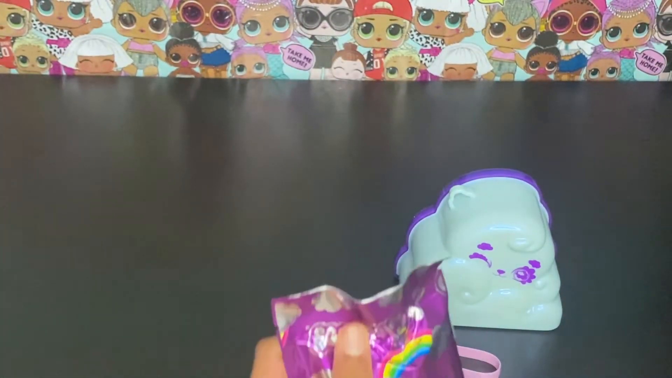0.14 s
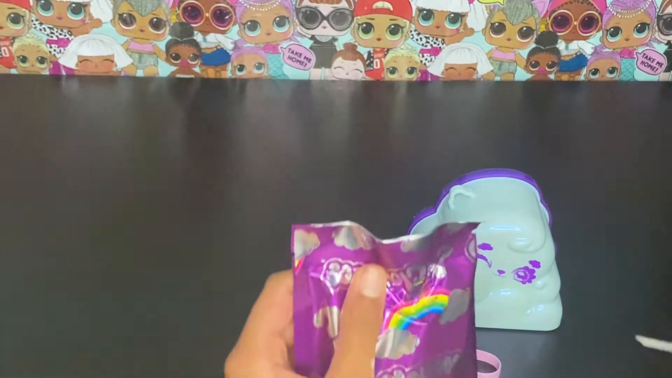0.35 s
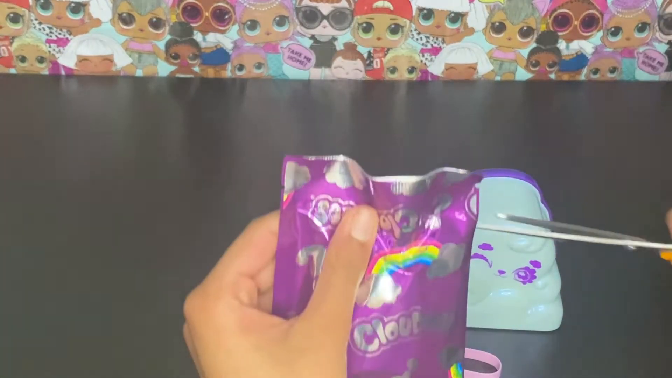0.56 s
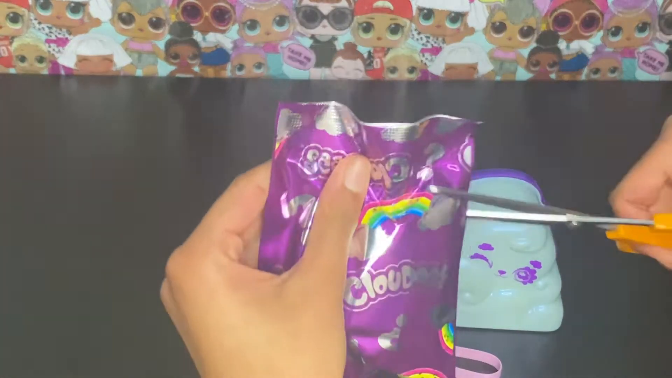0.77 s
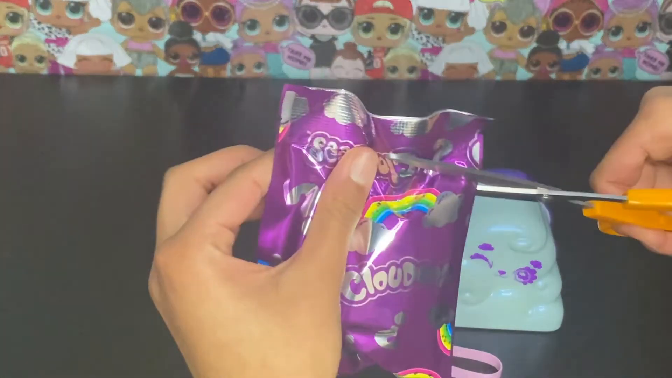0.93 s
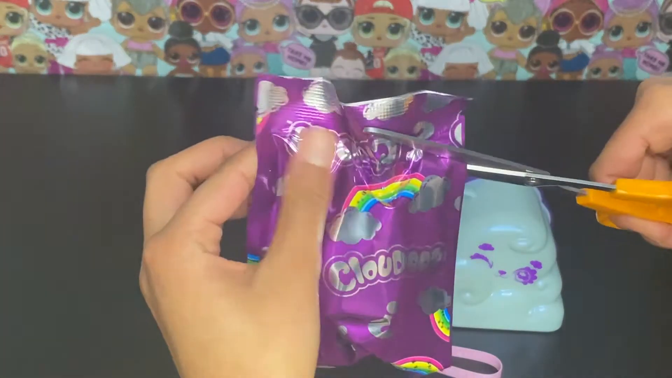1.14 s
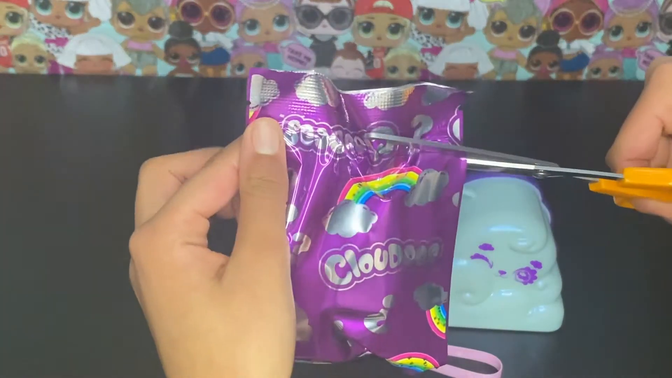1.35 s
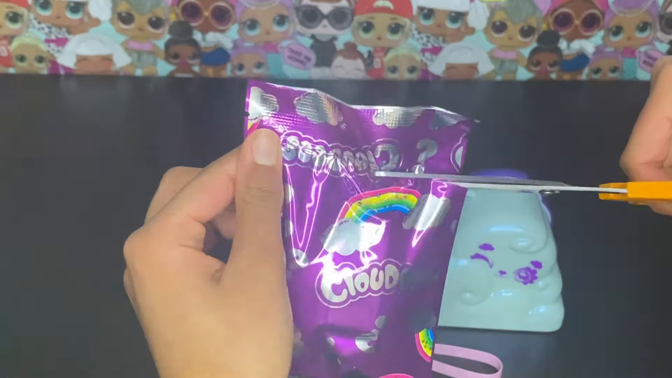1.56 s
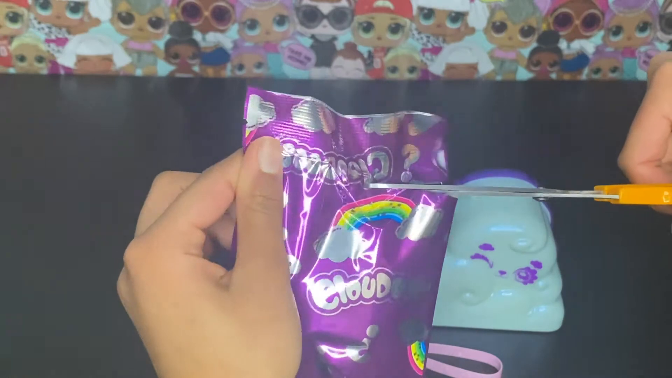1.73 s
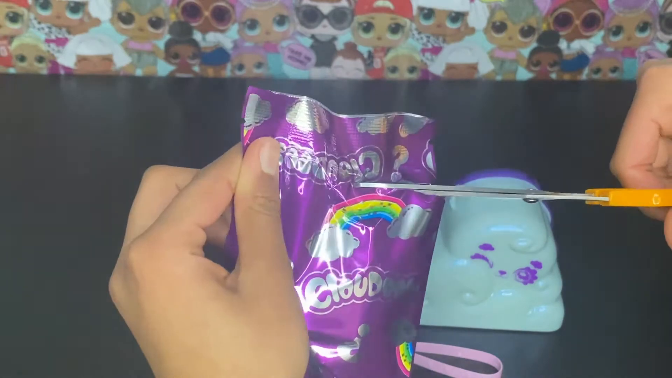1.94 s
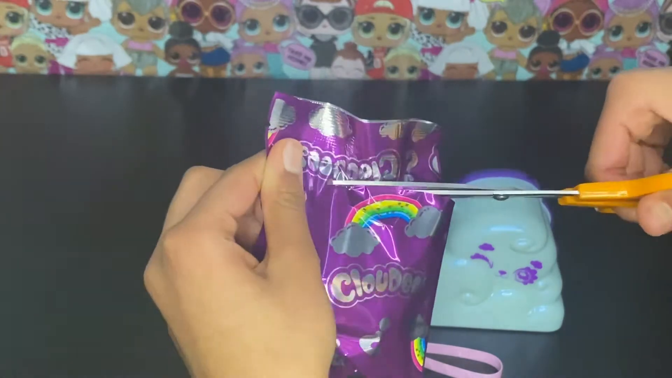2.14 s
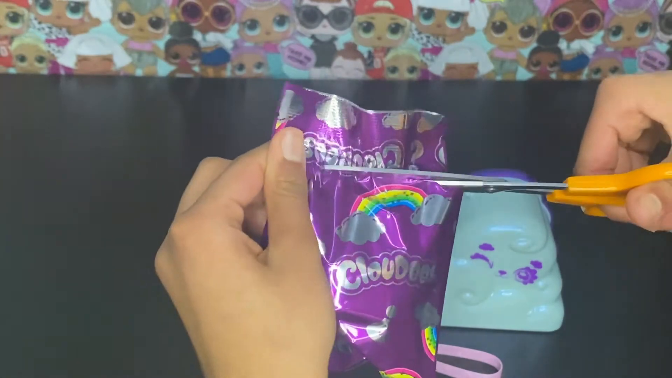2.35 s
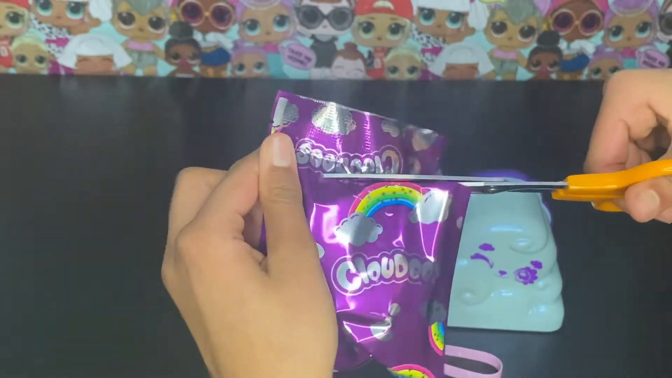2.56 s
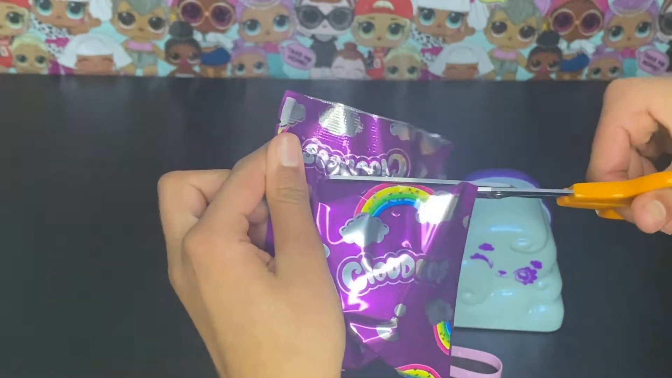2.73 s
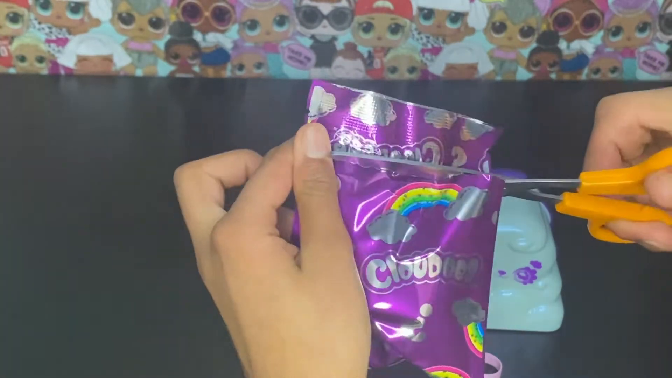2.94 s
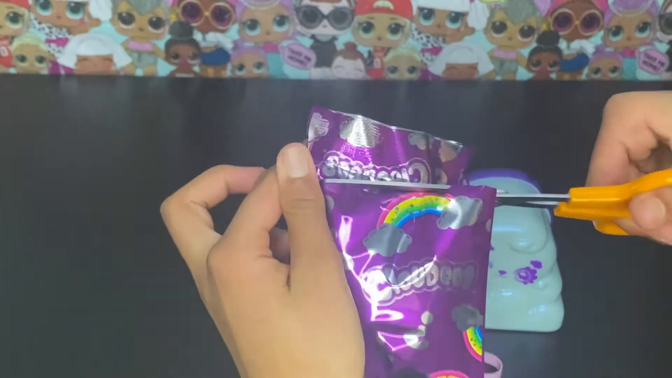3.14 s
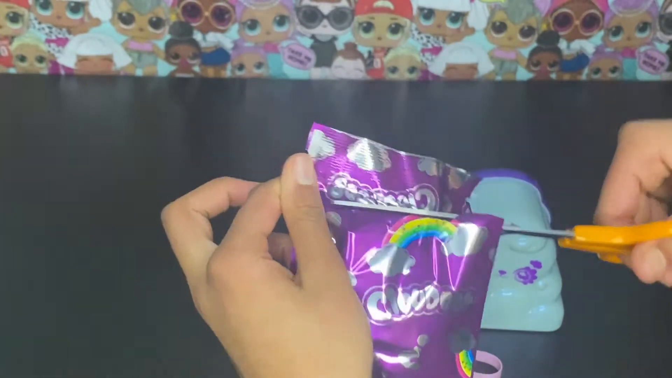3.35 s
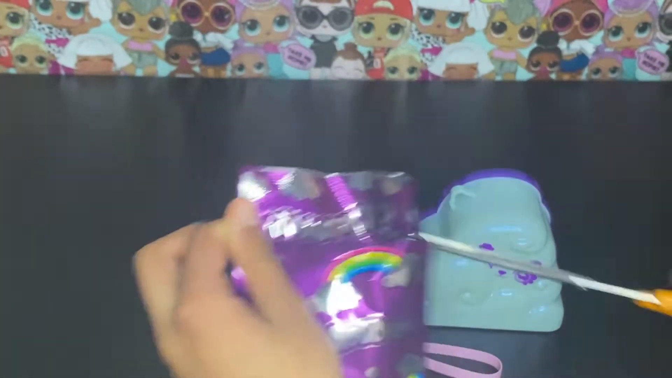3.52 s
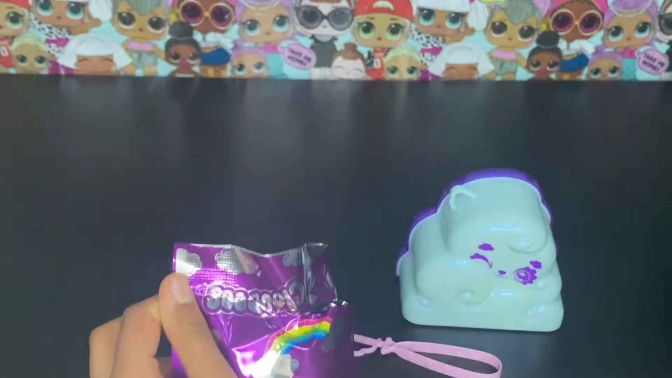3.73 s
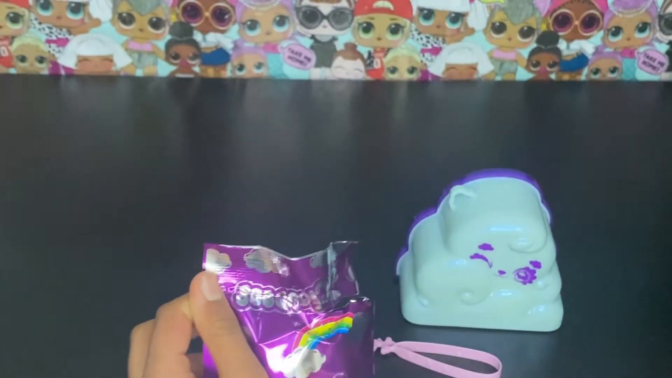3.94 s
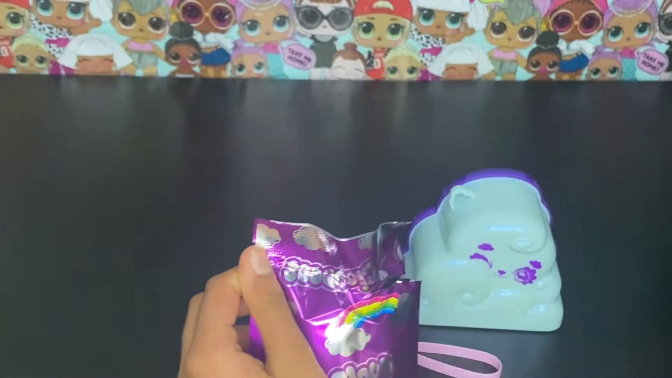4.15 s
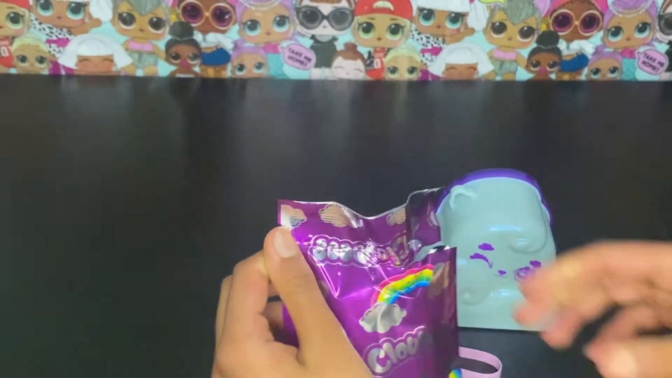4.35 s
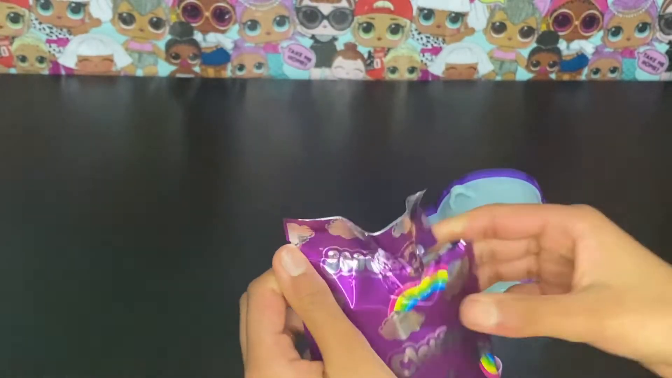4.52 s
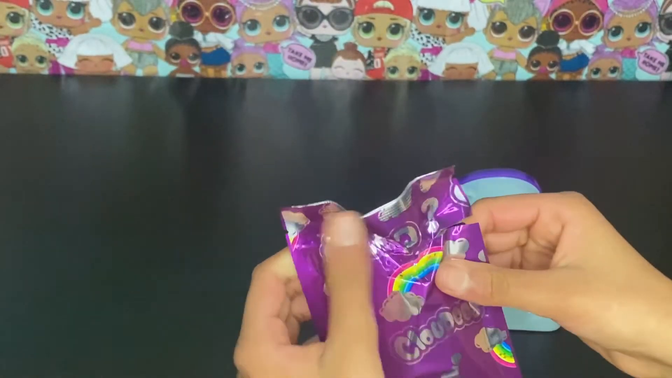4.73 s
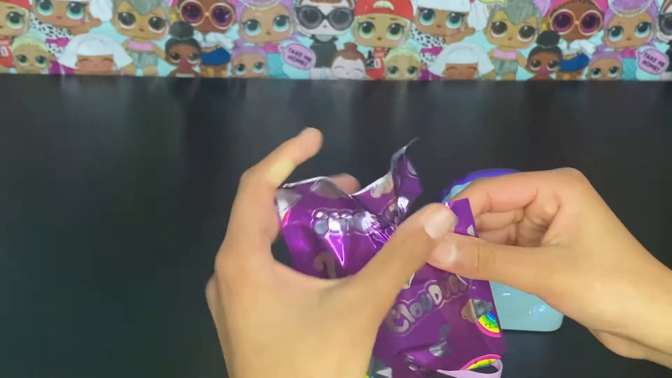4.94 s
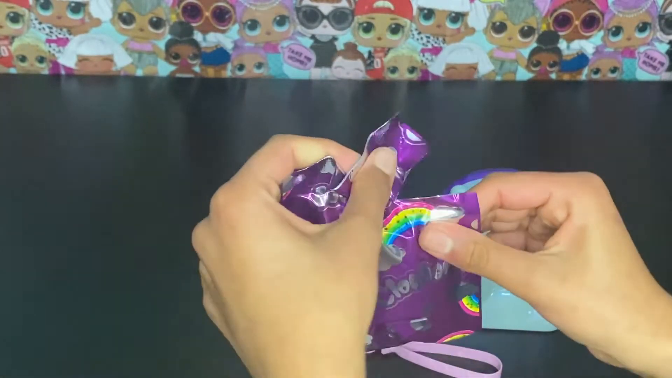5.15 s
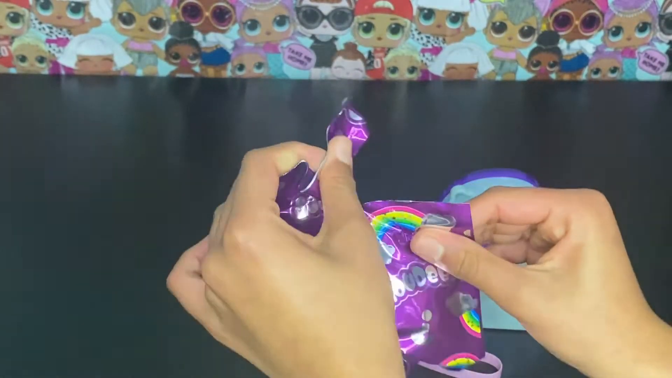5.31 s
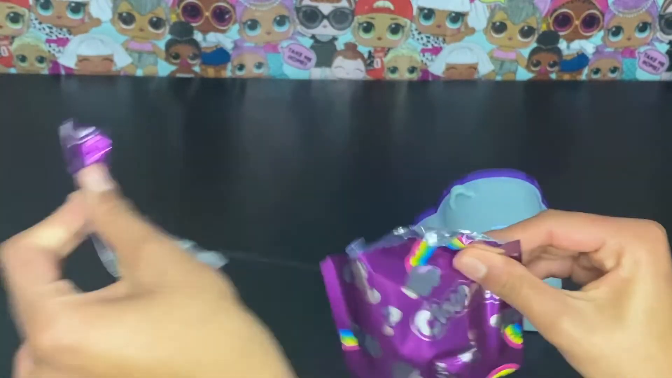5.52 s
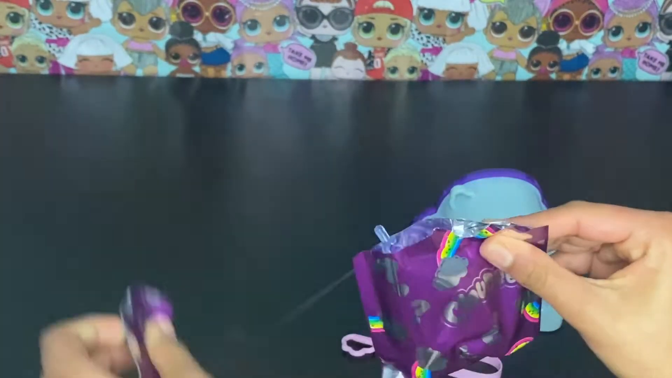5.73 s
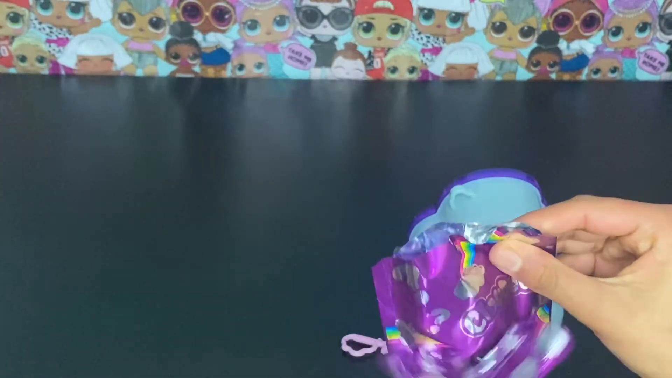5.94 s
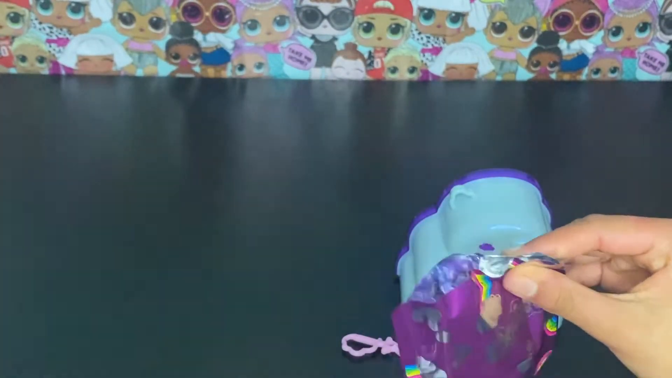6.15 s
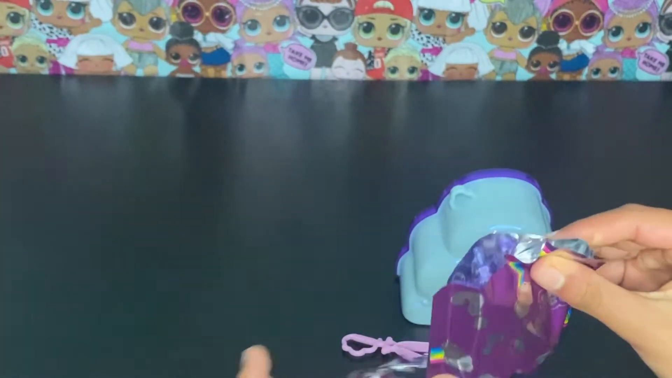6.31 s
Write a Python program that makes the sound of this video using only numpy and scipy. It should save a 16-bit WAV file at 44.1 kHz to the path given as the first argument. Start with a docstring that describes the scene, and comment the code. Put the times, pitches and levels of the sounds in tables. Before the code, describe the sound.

A small foil packet crinkles and snaps close up, is snipped with scissors, then its top strip rips away in quick crunchy tugs.

```python
"""A foil packet is picked up over a table, cut open with scissors and its top strip pulled off, heard close up.
Squeezes drive fine crackle, hollow flexing and small creases; larger creases snap as filtered impulses and
avalanches, and flipped panels pop as short sagging notes. Slides and seam rips are dense runs of tiny clicks.
The blades tick and ring in decaying steel modes, and the hands thud and rub on the table as shaped noise.
A short, sparse room tail and a faint steady hiss surround it all."""
import sys
import numpy as np
from scipy import signal
from scipy.fft import rfft, irfft, next_fast_len
from scipy.io import wavfile
from scipy.ndimage import uniform_filter1d

SR = 44100
rng = np.random.default_rng(int(sys.argv[2]) if len(sys.argv) > 2 else 0)


def int16_out(signal):
    """Quantize to a 16-bit WAV file."""
    q = np.round(np.clip(np.atleast_2d(signal).T, -1, 1) * 32767)
    wavfile.write(sys.argv[1], SR, q.astype(np.int16))


N = 285768
TIME = np.arange(N) / SR

# Event and blade levels below are before each layer's own trim; spectrum levels are relative.
# fingers or blades squeeze the foil: start t/s, hold/s, crackle level/dB, whole-pouch flexing level/dB
SQUEEZES = [(0, .17, -75.5, -73), (.19, 0.19, -68.5, -68.5), (.37, 0.3, -59.5, -64),
            (.69, 0.24, -76, -62.5), (.88, 0.15, -63, -71), (1.04, 0.041, -43, -80),
            (1.24, 0.19, -52.5, -67.5), (1.36, 0.22, -44, -59), (1.63, 0.091, -63, -51),
            (1.76, 0.18, -59, -73), (1.9, 0.2, -56, -52.5), (2.1, 0.36, -52.5, -56),
            (2.33, 0.31, -53.5, -58.5), (2.66, 0.31, -53.5, -52), (2.74, 0.044, -34.5, -38),
            (3.04, 0.22, -52.5, -68.5), (3.28, 0.12, -48.5, -63), (3.38, 0.061, -38.5, -41.5),
            (3.46, 0.1, -41.5, -46.5), (3.62, 0.26, -65.5, -72), (4.36, 0.12, -64.5, -81),
            (4.51, 0.023, -37.5, -57), (4.64, 0.69, -52.5, -66), (5.05, 0.48, -47.5, -71),
            (5.71, 0.22, -50.5, -59.5), (6.05, 0.11, -54.5, -80), (6.13, .35, -58.5, -68)]
# a hand presses and shifts on the table: start t/s, hold/s, thud level/dB, rub level/dB
PRESSES = [(0, 0.023, -66, -61), (.15, 0.46, -67, -64.5), (.68, 0.021, -50.5, -53), (1.41, 0.19, -71, -81),
           (1.65, 0.17, -56.5, -66.5), (1.89, 0.15, -66, -54.5), (2.12, 0.52, -76, -73.5),
           (2.57, 0.065, -54, -53), (2.66, .41, -49.5, -50), (3.09, 0.094, -58, -56),
           (3.28, 0.19, -61, -57.5), (3.46, 0.11, -73.5, -49), (3.66, 0.59, -82.5, -82.5),
           (4.51, 0.087, -71, -54.5), (4.68, 0.091, -81, -59), (4.93, 0.29, -76, -66),
           (5.4, 0.063, -53, -43.5), (5.5, .19, -79, -59), (5.71, 0.11, -83, -53.5),
           (5.93, 0.166, -71, -59.5), (6.07, 0.05, -58, -53), (6.2, 0.23, -84, -78)]
# single creases buckling: t/s, level/dB, bass against the middle/dB, treble against the middle/dB
SNAPS = [(0.1793, -18.5, -3, -27), (0.1928, -21, 3, -12), (0.2082, -11, -4, -1), (0.3016, -28, 18, -5),
         (0.3696, -4.5, -4, -10), (0.4452, -3.5, -3, -6), (0.452, 1.5, 5.5, -5.5), (0.505, -21, -2, 4),
         (0.523, -14, 7, -37), (0.5979, -4, 1.5, -19), (0.6918, -1, -4.5, -1.5), (0.7257, 4, -15, -7),
         (0.882, -19, 4, -17), (0.9233, -22.5, 9, -19), (0.946, -21.5, -15, -12.5), (0.966, -24, 7, -26),
         (0.983, -28.5, 10, -13), (1.0563, -13, -11, -3.5), (1.0732, -9.5, -25, -8), (1.125, -25.5, 12, 9),
         (1.2093, -20, 1, -1), (1.2364, -4, 5.5, -2.5), (1.316, -11.5, -3, -14), (1.3592, -19.5, 9, 3),
         (1.3706, -2.5, -5, -7.5), (1.4104, -4.5, -2, 8), (1.426, -13.5, 20, -13), (1.4677, -2, -1, 1),
         (1.4975, -4, 8, -22), (1.5024, -5, -3, 8.5), (1.509, -4.5, -27, 1), (1.564, -2.5, -20, -6.5),
         (1.5697, -6, 9.5, -35), (1.5768, 8.5, -51, -16.5), (1.6335, -4, 1.5, -4), (1.651, 3.5, -1.5, -3.5),
         (1.6965, 0, -20, -6), (1.708, 2, -4.5, -12.5), (1.7752, -18, -1, -4), (1.805, -14, 1, 1),
         (1.9036, -13.5, 12, -3.5), (1.947, -13, 6, -9), (2.104, -21, 14.5, -10), (2.1664, -0.5, 1, -13),
         (2.2668, -4.5, -11, -0.5), (2.335, -8, -10, -9), (2.3406, 3.5, 0.5, -6.5), (2.375, 6.5, -6, 1.5),
         (2.3788, 3, -5, -1), (2.413, 3, -4.5, -5.5), (2.4391, 9.5, -7, -10.5), (2.461, 0, -18, -5.5),
         (2.4888, -7, -5, 2), (2.4996, 0, -7, 6), (2.5086, -2, 0, -18), (2.5278, 10, -2, -7.5),
         (2.5605, -15, 7, 16), (2.567, -2.5, -43, -18), (2.601, -6.5, -6, -47), (2.6726, -6.5, -3, -10.5),
         (2.7043, -7, 6, -8), (2.7379, -3, 7, -2), (2.7656, -2, 11, 0), (2.7896, -5, -2, -14),
         (2.8066, 5, 2, 1), (2.83, -6.5, -18, 7.5), (2.8353, 6, -9.5, -11), (2.8834, -14, 15, -29),
         (2.9376, -9.5, 6, -28), (2.981, -11.5, 1, -50), (3.0109, -4, -1, -22), (3.0218, -11, 13.5, -11),
         (3.0486, -0.5, -7, -0.5), (3.067, 6, -2, -4.5), (3.1125, -4.5, -1, -27), (3.128, 2, -6.5, -6.5),
         (3.145, -13, -9, 7.5), (3.1698, 1, -13, 1.5), (3.179, -16, 3, 8), (3.191, -15.5, -24, 5),
         (3.2622, 3, -10, -6), (3.296, -11.5, 8, -25), (3.3163, 0.5, -1, -3), (3.3679, -3, -1.5, 3),
         (3.3785, -14.5, -10, 6.5), (3.393, 4, -6, -6.5), (3.412, -1.5, 7, -22), (3.4209, -3, 9, -6),
         (3.4664, 1, 3, -9), (3.5072, 6.5, -3, -7), (3.5294, -4, -28, 0), (3.5367, 5, -45, -3.5),
         (3.562, 3.5, 0, 0), (3.6802, -11, 3.5, -3.5), (3.85, -27.5, -4, -9), (3.93, -29.5, 10.5, -27),
         (3.972, -35.5, 12, -15), (4.0741, -23, -6, -4), (4.372, -28.5, -0.5, -11),
         (4.4523, -21.5, -10, -10), (4.5265, 0, -6.5, -6.5), (4.5334, -9, 3.5, 1.5), (4.561, 0, -5, -0.5),
         (4.6446, -5, 3.5, -0.5), (4.6517, -2, -5, 4), (4.6915, 0, -9, -5.5), (4.7094, -1.5, -3, -1.5),
         (4.7446, -6, -3, 1), (4.7636, -2, 6.5, -5.5), (4.7969, -6.5, -31, -4.5), (4.814, -6.5, -25, -6),
         (4.8727, -9, -18, -4.5), (4.8777, -6.5, -12, -14), (4.9271, -8.5, 1, -7.5),
         (4.9325, -2.5, -10, -19), (4.947, -16.5, 2, 2.5), (4.9961, -4, -11, -4), (5.0536, -4, 7.5, 1.5),
         (5.0766, -1, 5, -9), (5.0915, -2, -4, -9), (5.109, 1, -25, -1.5), (5.126, -2.5, -12, -2),
         (5.1495, -5, -16, 0), (5.1756, 2, -3, -7), (5.2036, -1, 6.5, -11), (5.239, -1, 3, -9.5),
         (5.2654, -4, 0, -2), (5.3074, -6, -1, -11), (5.3178, -2.5, -3, -25), (5.353, 2, -24, -4.5),
         (5.3635, 1, -8, -13), (5.3805, 7, -0.5, 0.5), (5.4386, 7, 8, -1), (5.4472, 12.5, -2, -6),
         (5.6723, -22, 11, -5), (5.724, -1, -3.5, -5), (5.7953, -2.5, 1, 0), (5.8205, -10, 3, -2.5),
         (5.95, -27, -8, 0), (6.145, -19.5, -1, -12), (6.2348, -21.5, -20, -10), (6.323, -17.5, -12, -27),
         (6.403, -16, -30, -2.5)]
# foil slides along steel or skin: start t/s, hold/s, level/dB
SLIDES = [(.695, 0.074, -39.5), (.77, 0.057, -44.5), (1.055, 0.062, -50), (1.895, .14, -46.5),
          (4.3, 0.29, -69), (5.38, 0.11, -36.5), (5.49, 0.33, -57), (6.22, 0.074, -59)]
# a whole panel of the pouch pops in or out: t/s, level/dB, centre pitch f/Hz
POPS = [(1.056, -37, 920), (1.073, -36.5, 880), (1.237, -26, 1674), (1.315, -37.5, 850), (1.36, -42, 736),
        (1.4, -35, 754), (1.424, -31, 823), (1.459, -25.5, 646), (1.494, -27.5, 680), (1.53, -32.5, 734),
        (1.554, -30.5, 780), (1.566, -40, 1885), (1.648, -26.5, 577), (2.166, -21, 1787)]
# scissor blades touch: t/s, level/dB, brightness/dB (the low end is cut by three times this)
PINGS = [(3.743, -27.5, 9), (3.831, -39.5, 8.5), (3.957, -50, -0.5), (3.971, -63, 4)]
# ringing modes of the steel blades: f/Hz, level/dB, t60/s
BLADE_MODES = [(802, -9, .04), (1960, -8, .05), (3682, -7, .05), (4764, -8, .04), (6600, 0, .06),
               (6858, -5, .05), (7450, -6, .03), (8000, -8, .04), (9324, -10, .05), (12670, -8, .05),
               (13310, -12, .04)]
# the seam rips in tugs as the top strip is pulled: start t/s, hold/s, level/dB
RIPS = [(5.045, 0.0058, -22), (5.145, 0.058, -25.5), (5.365, 0.088, -30)]

# spectrum of the fine crackle: f/Hz, level/dB
CRACKLE_SPECTRUM = [(300, -27), (1000, -16), (2600, -3.5), (6000, -4), (10000, -8.5), (13500, -20.5),
                    (16000, -15)]
# spectrum of the flexing pouch: f/Hz, level/dB
FLEX_SPECTRUM = [(120, -23), (350, -7), (700, -6.5), (1200, -9.5), (2500, -8.5), (6000, -46.5)]
# spectrum of thuds through the table top: f/Hz, level/dB
THUD_SPECTRUM = [(20, -38), (35, -26.5), (48, -10.5), (58, -1.5), (70, 0.5), (82, -8), (110, -18),
                 (170, -28), (500, -61.5)]
# spectrum of rubbing skin: f/Hz, level/dB
RUB_SPECTRUM = [(50, -23), (110, 0.5), (160, 3.5), (230, -1), (320, 2), (430, -13), (650, -18.5),
                (2000, -35.5)]
# spectrum of a snapping foil sheet: f/Hz, level/dB
FOIL_SPECTRUM = [(60, -42), (200, -29), (400, -8.5), (650, -2), (1200, 0), (1650, -1), (2700, 2.5),
                 (4500, 2), (6500, 4), (10000, 2.5), (13000, -1), (16000, -8)]
# spectrum of sliding foil: f/Hz, level/dB
SLIDE_SPECTRUM = [(100, -20), (400, 4), (1000, 11), (2700, 8), (6000, -1.5), (10000, -5.5), (16000, -19.5)]
# spectrum of the ripping seam: f/Hz, level/dB
SEAM_SPECTRUM = [(250, -32), (600, -1), (2500, -1.5), (6500, -0.5), (13500, 2.5), (16000, -17)]
# spectrum of the steady background hiss: f/Hz, level/dB
AIR_SPECTRUM = [(20, -14), (70, 0), (200, -5), (600, -13), (3000, -19), (9000, -26), (16000, -34)]
# ring time of the room: f/Hz, t60/s
ROOM_T60 = [(200, 0.14), (700, 0.14), (2500, 0.16), (7000, 0.13), (14000, 0.17)]
# phase between the two microphone ports: f/Hz, right leads by/rad
PORT_PHASE = [(0, 0), (300, 0), (700, -.45), (1100, .1), (2200, .2), (3200, -.5), (5000, -.1), (6500, 0),
              (7400, 1), (8500, 3.14), (12000, 9.42), (16000, 15.7)]
# balance of the two microphone ports: f/Hz, left over right/dB
PORT_BALANCE = [(150, 0), (400, -1.5), (850, 4), (1350, 2), (1550, -3), (1900, 1.5), (2800, 0)]

AIR_DB = -81
EDGE_HZ = 16200  # top of the audible band
# power share of a snap that is an avalanche of tiny creases (0-1):
# small while the foil is held flat, large once the fingers crumple it
FLAT_SHARE, CRUMPLED_SHARE = 0.3, 0.64
CRUMPLE_FROM_S = 4.4


def amp(db):
    """Decibels to gain."""
    return 10 ** (np.asarray(db) / 20)


def unit(x):
    """Scales to an rms of 1."""
    return x / np.sqrt(np.mean(x ** 2) + 1e-20)


def read(points, hz):
    """Reads a curve on a log-frequency axis."""
    f, value = np.transpose(points)
    return np.interp(np.log(hz + 1), np.log(f + 1), value)


def level(rows, attack_s, release_s, axis=2):
    """Each gesture swells, holds and dies away; gestures that overlap add in power."""
    power = np.zeros(N)
    for row in rows:
        t = TIME - row[0]
        attack = np.clip(t / attack_s, 0, 1)
        release = np.exp(-np.maximum(t - row[1], 0) / release_s)
        power += (amp(row[axis]) * attack * release) ** 2
    return np.sqrt(power)


def add(mix, s, sound):
    """Mixes a sound in at time s."""
    start = max(round(s * SR), 0)
    part = mix[..., start:][..., :sound.shape[-1]]
    part += sound[..., :part.shape[-1]]


def causal(gain_db):
    """The most compact causal (minimum-phase) impulse response with the given spectrum."""
    log_gain = np.log(amp(np.concatenate([gain_db, gain_db[-2:0:-1]])))
    return np.fft.ifft(np.exp(np.conj(signal.hilbert(log_gain)))).real


def colour(x, points, size=4096):
    """Gives a signal a spectrum and an rms of 1."""
    response = causal(read(points, np.fft.rfftfreq(size, 1 / SR)))
    return unit(signal.oaconvolve(x, response)[:N])


def grains(points, per_s, spread_db, facet_db, count=14):
    """Countless tiny creases of uneven size, shared among a few facets of differing colour."""
    hz, out = np.geomspace(100, 17000, 36), np.zeros(N)
    facet = rng.integers(0, count, N)
    sizes = amp(spread_db * np.minimum(rng.exponential(1, N), 3))
    clicks = (rng.random(N) < per_s / SR) * rng.choice([-1, 1], N) * sizes
    for k in range(count):
        facet_curve = read(points, hz) + facet_db * rng.standard_normal(len(hz))
        out += colour(clicks * (facet == k), np.c_[hz, facet_curve])
    return unit(out)


def squeeze():
    """How hard the foil is being worked at every sample."""
    return level(SQUEEZES, attack_s=0.0071, release_s=0.047, axis=2)


def crinkle(crackle_db=-5, flex_db=-2, crisp_db=-50, soft_hz=4500):
    """Crackle and hollow flexing follow the fingers; quiet crackle is low-passed, loud crackle stays bright."""
    effort = squeeze()
    crackle = grains(CRACKLE_SPECTRUM, per_s=1100, spread_db=7, facet_db=2.5)
    soft = signal.lfilter(*signal.butter(1, soft_hz, fs=SR), crackle)
    crisp = effort / (effort + amp(crisp_db))  # share of the unfiltered crackle
    blend = crisp * crackle + (1 - crisp) * soft
    bending = level(SQUEEZES, attack_s=0.015, release_s=0.0084, axis=3)
    flex = bending * grains(FLEX_SPECTRUM, per_s=350, spread_db=1.0, facet_db=4.5)
    return amp(crackle_db) * effort * blend + amp(flex_db) * flex


def hands(thud_db=-1, rub_db=-2):
    """Dull bumps through the table top and the rub of skin, both shaped noise."""
    press = level(PRESSES, attack_s=0.041, release_s=0.029, axis=2)
    thud = press * colour(rng.standard_normal(N), THUD_SPECTRUM)
    shift = level(PRESSES, attack_s=0.0067, release_s=0.04, axis=3)
    rub = shift * colour(rng.standard_normal(N), RUB_SPECTRUM)
    return amp(thud_db) * thud + amp(rub_db) * rub


def small_creases(above_db=27, spread_db=1.0, bass_db=0, treble_db=-5, colour_db=7, count=240):
    """Lesser creases buckle at random, each with its own colour, louder the harder the foil is squeezed."""
    at = rng.integers(0, N, count)
    size, bass, treble = rng.standard_normal((count, 3)).clip(-2, 2).T
    db = 20 * np.log10(squeeze()[at] + 1e-9) + above_db + spread_db * size
    return list(zip(at / SR, db, bass_db + colour_db * bass, treble_db + colour_db * treble))


def avalanche(t, ring_s, flutter_db, flutter_s, onset_s=0.00079):
    """Tiny creases: a short ring and spiky flutter around a larger crease, with a softened onset."""
    onset, after = np.exp(np.minimum(t, 0) / onset_s), np.maximum(t, 0)
    ring = rng.standard_normal(len(t)) * onset * np.exp(-after / ring_s)
    flutter = rng.standard_normal(len(t)) ** 3 * onset * np.exp(-after / flutter_s)  # cubing makes it spiky
    return unit(unit(ring) + amp(flutter_db) * unit(flutter)) / np.sqrt(len(t))  # energy of 1


def snaps(gain_db=1.0, table_db=-12, table_s=0.0044, travel_s=0.00017, size=2048):
    """A crease flips with a crack and sets off its neighbours; the sheet carries it and the table reflects it."""
    lead = size // 16  # samples before the crack
    hz, t, out = np.fft.rfftfreq(size, 1 / SR), (np.arange(size) - lead) / SR, np.zeros(N)
    facet_hz, facet_db = np.geomspace(200, 17000, 30), 2.6
    for s, db, bass_db, treble_db in SNAPS + small_creases():
        facet = read(np.c_[facet_hz, rng.standard_normal(len(facet_hz))], hz)  # each facet has its own resonances
        tilt = read([(850, bass_db), (1500, 0), (3600, 0), (6500, treble_db)], hz)
        share = FLAT_SHARE if s < CRUMPLE_FROM_S else CRUMPLED_SHARE
        push = np.sqrt(share) * avalanche(t, ring_s=0.0015, flutter_db=-4.5, flutter_s=0.0072)
        push[lead] += np.sqrt(1 - share)
        add(push, table_s * rng.uniform(1.0, 1.3), amp(table_db) * push)
        z = rfft(push)
        # flatten the random peaks of the noise, leaving a smooth, less ringing crack
        z /= np.sqrt(uniform_filter1d(abs(z) ** 2, size=16))
        # bending waves are dispersive: the treble arrives first; travel_s is the longest delay at 4 kHz
        bend = np.exp(-4j * np.pi * travel_s * rng.random() * np.sqrt(4000 * hz))
        sheet = rfft(causal(read(FOIL_SPECTRUM, hz) + tilt + facet_db * facet)) * bend
        crack = irfft(z * sheet)
        add(out, s + t[0], rng.choice([-1, 1]) * amp(db + gain_db) * crack)
    return out


def slides(gain_db=-1):
    """Sliding is a dense run of minute slips."""
    stroke = level(SLIDES, attack_s=0.004, release_s=0.016)
    return amp(gain_db) * stroke * grains(SLIDE_SPECTRUM, per_s=5800, spread_db=3.5, facet_db=7)


def pops(gain_db=0, rise_s=0.0003, decay_s=0.0032, upper=2.2, upper_db=-8):
    """A flipped panel gives a short hollow note; its pitch jitters and sags as the foil relaxes."""
    t, out = np.arange(SR // 20) / SR, np.zeros(N)
    sag, waver = 0.1, 0.12  # shares of the pitch
    swell = (1 - np.exp(-t / rise_s)) * np.exp(-t / decay_s)
    for s, db, hz in POPS:
        jitter = waver * unit(uniform_filter1d(rng.standard_normal(len(t)), size=30))
        glide = sag * (2 * np.exp(-t / decay_s) - 1)  # from above the centre pitch to below it
        turns = np.cumsum(hz * (1 + jitter + glide)) / SR
        note = np.sin(2 * np.pi * turns) + amp(upper_db) * np.sin(2 * np.pi * upper * turns)
        add(out, s, amp(db + gain_db) * swell / swell.max() * note)
    return out


def scissors(gain_db=0, tick_s=0.0032, size=512):
    """A light steel tick sets the blades ringing briefly; each touch favours other modes."""
    t, out = np.arange(SR // 3) / SR, np.zeros(N)
    hz, mode_db, t60 = np.array(BLADE_MODES).T[:, :, None]
    bins = np.fft.rfftfreq(size, 1 / SR)
    ring_db, strike_db = -13, 3  # ring against the tick, random spread of the modes
    for s, db, bright_db in PINGS:
        tilt = [(800, -3 * bright_db), (4500, -1.5 * bright_db), (6400, 0)]
        weight_db = ring_db + mode_db + read(tilt, hz) + strike_db * rng.standard_normal(hz.shape)
        modes = np.sin(2 * np.pi * (hz * t + rng.random(hz.shape)))
        ring = (amp(weight_db - 60 * t / t60) * modes).sum(0)
        burst = rng.standard_normal(len(t)) * np.exp(-t / tick_s)
        tick = signal.lfilter(causal(read(tilt, bins)), 1, burst)
        add(out, s, amp(db + gain_db) * (ring + tick))
    return out


def rip(gain_db=-2):
    """The seam parts in a fast run of tiny bright breaks."""
    pull = level(RIPS, attack_s=0.0066, release_s=0.015)
    return amp(gain_db) * pull * grains(SEAM_SPECTRUM, per_s=2300, spread_db=0.5, facet_db=3)


def room(x, build_s=0.00053, size=256, count=6):
    """Sparse reflections die band by band; a few random tail patterns take turns, so no colour stays fixed."""
    t, out = np.arange(SR // 2) / SR, np.zeros(N)
    turn = (TIME / 0.023).astype(int) % count  # the next pattern every 23 ms
    for k in range(count):
        sparse = rng.standard_normal(len(t)) * (rng.random(len(t)) < 4000 / SR)  # about 4000 taps a second
        taps = sparse * (1 - np.exp(-(t / build_s) ** 2))
        hz, when, z = signal.stft(taps, SR, nperseg=size)
        decay = amp(-60 * when / read(ROOM_T60, hz)[:, None])
        tail = signal.istft(z * decay, SR, nperseg=size)[1]
        share = np.sqrt(np.abs(uniform_filter1d(1. * (turn == k), size)))  # crossfade between patterns
        out += signal.oaconvolve(x * share, tail / np.linalg.norm(tail))[:N]
    return out


def scene(room_db=-7, wide_db=-13.0, hands_side_db=-23):
    """The packet is close and central; part of the room and hand sound differs from left to right."""
    near = snaps() + pops() + crinkle() + slides() + rip() + scissors()
    air = amp(AIR_DB) * colour(rng.standard_normal(N), AIR_SPECTRUM)
    middle = near + amp(room_db) * room(near) + hands() + air
    side = amp(wide_db) * room(near) + amp(hands_side_db) * hands()  # fresh random draws
    return np.array([middle + side, middle - side])


def record(dry):
    """Two microphone ports differ in phase and balance; a soft ceiling rounds loud cracks before the band limit."""
    size = next_fast_len(N + 4096)
    hz = np.fft.rfftfreq(size, 1 / SR)
    phase = np.interp(hz, *np.transpose(PORT_PHASE))
    port = amp(read(PORT_BALANCE, hz) / 2) * np.exp(-0.5j * phase)  # half the difference on each side
    heard = irfft(rfft(dry, size) * np.array([port, 1 / port]), size)[:, :N]
    heard = heard / (1 + (heard / 0.85) ** 4) ** 0.25
    heard = signal.sosfilt(signal.butter(3, 36, "high", fs=SR, output="sos"), heard)
    band = signal.firwin(255, EDGE_HZ, window=("kaiser", 9), fs=SR)
    return signal.oaconvolve(heard, band[None], "same")


dry = scene()
out = record(dry)
int16_out(out)
```